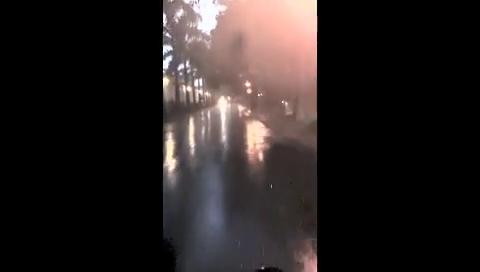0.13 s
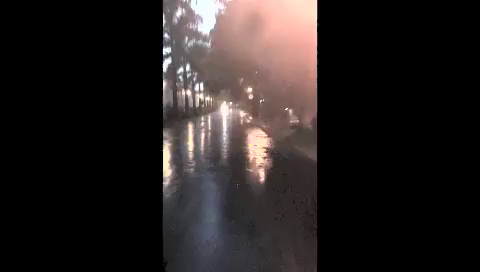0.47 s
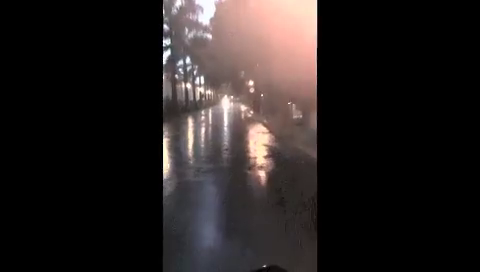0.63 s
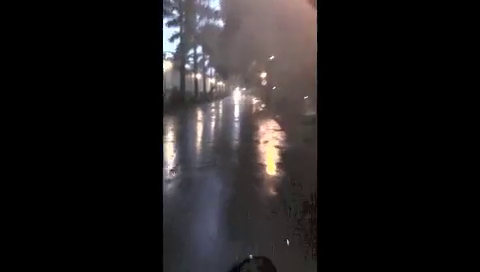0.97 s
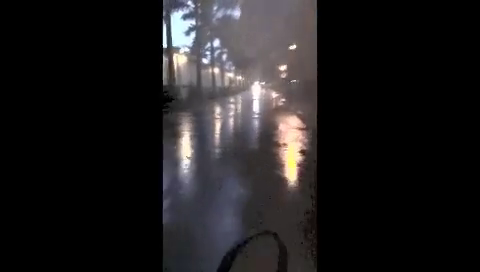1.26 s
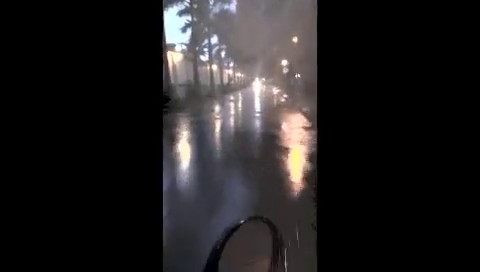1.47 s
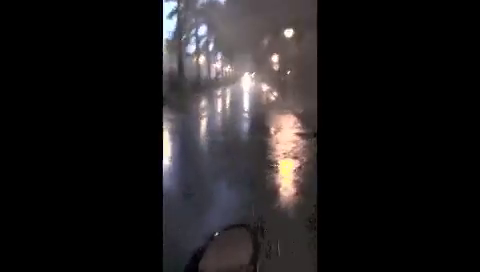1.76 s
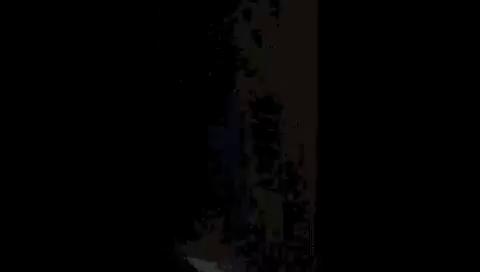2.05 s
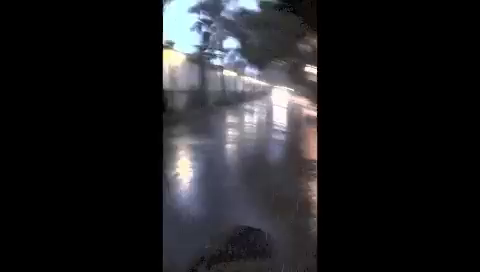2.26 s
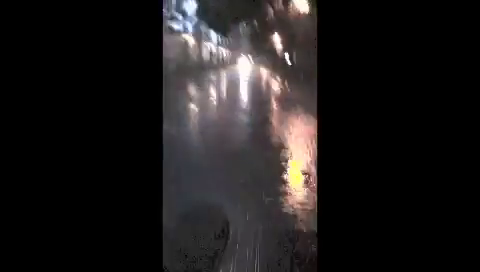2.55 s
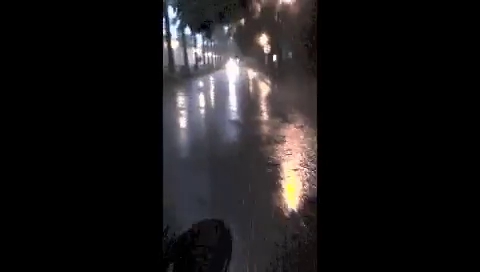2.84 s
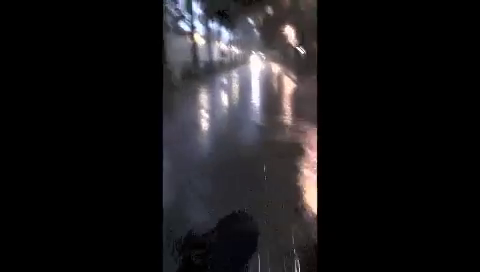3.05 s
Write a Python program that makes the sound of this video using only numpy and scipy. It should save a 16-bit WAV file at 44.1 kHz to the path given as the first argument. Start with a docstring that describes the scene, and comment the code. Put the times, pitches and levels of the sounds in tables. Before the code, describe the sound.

Small motorbike ride on a wet road: steady dull roar with faint uneven engine putter, raindrops knocking the microphone housing more often after one second, then heavy wind thumps late, heard through a muffled onboard microphone.

```python
"""A wet road in rain, ridden by a small motorbike, heard through a muffled microphone on board.
Exhaust thumps ring a pipe inside the road roar, which is drifting, flickering noise.
Wind gusts buffet the microphone with dense pushes and single slaps; the drops are short damped rings.
A gain control pulls everything down on the strongest sounds and recovers slowly."""
import sys
import numpy as np
from scipy import signal
from scipy.io import wavfile
from scipy.ndimage import uniform_filter1d, minimum_filter1d

SR = 44100
rng = np.random.default_rng(int(sys.argv[2]) if len(sys.argv) > 2 else 0)


def int16_out(signal):
    """Quantize to a 16-bit WAV file."""
    q = np.round(np.clip(np.atleast_2d(signal).T, -1, 1) * 32767)
    wavfile.write(sys.argv[1], SR, q.astype(np.int16))


def magnitude_from_level(level_db):
    """Linear magnitude for a level in decibels (20 dB per decade)."""
    exponent = np.asarray(level_db, float) / 20
    return 10 ** exponent


N = 141120

# road roar and spray, spectrum: (frequency [Hz], relative density [dB per Hz])
ROAR_COLOUR = [(24, -74), (40, -39.5), (75, -27.5), (101, -9.5), (120, 0.5), (281, -2.5), (326, -5.5),
               (361, -2.5), (463, -7.5), (691, -5.5), (1200, -19), (1580, -31.5), (4390, -53.5),
               (15700, -71.5)]
# roar level: (time [s], rms [dB])
ROAR_LEVEL = [(0, -30), (.3, -30.5), (.7, -28.5), (1.101, -28.5), (1.6, -27.5), (2.099, -29), (2.452, -26),
              (2.8, -27), (3.2, -29)]
PATCH_RMS_DB, FLICKER_RMS_DB = 0.5, 1.5

# heavy drops knocking on the housing: (time [s], peak [dB], pitch [Hz], second mode re first [dB])
KNOCKS = [(0.1224, -36.5, 1000, -0.5), (.405, -21, 993, -18), (1.2002, -13, 838, -14),
          (1.435, -32.5, 1000, -4), (1.499, -25, 880, -12), (1.61, -37, 1100, -2.5),
          (1.542, -13.5, 852, -18.5), (1.678, -18, 957, -17.5), (1.754, -16, 760, -19),
          (1.786, -15, 958, -12), (1.985, -18.5, 900, -22), (2.081, -23.5, 720, -19),
          (2.169, -18.5, 800, -14), (2.191, -16.5, 738, -14.5), (2.247, -19, 832, -17.5),
          (2.357, -8.5, 873, -25.5), (2.43, -36, 1300, -4), (2.778, -17.5, 850, -21),
          (2.71, -4.5, 850, -25), (2.854, -10, 772, -16.5), (2.981, -22, 683, -19)]
KNOCK_WIDTH_HZ, OVERTONE_RATIO = 246, 1.74
# fine drops ticking: (time [s], low mode [dB], middle mode [dB], high mode [dB])
TICKS = [(0.074, -46, -63, -56), (0.114, -46, -46, -49), (0.279, -47, -49, -57), (0.343, -60, -52, -53),
         (0.672, -46, -61, -85), (0.778, -43, -45.5, -48), (0.7923, -45, -59, -71),
         (0.8646, -46, -63.5, -71), (1.201, -25.5, -38.5, -52), (1.217, -57, -71, -50.5),
         (1.2813, -69, -53, -50.5), (1.421, -50, -49, -51), (1.468, -37, -52, -88), (1.4996, -48, -65, -73),
         (1.574, -36, -38.5, -46), (1.718, -65, -47, -49.5), (1.7864, -40, -47, -89),
         (1.8406, -48, -59, -52), (1.908, -49, -46, -47), (1.9445, -45, -47, -48.5),
         (2.1628, -47, -46, -75), (2.2458, -36, -38, -38.5), (2.496, -59, -50, -50),
         (2.5816, -61, -72.5, -66), (2.654, -42, -60, -46.5), (2.8194, -59, -38, -47),
         (2.8315, -58, -46, -66), (2.8536, -70, -42.5, -76), (2.9088, -78, -42.5, -46),
         (2.957, -59, -44.5, -48)]
# modes that a tick rings: (frequency [Hz], width [Hz])
TICK_MODES = [(2600, 560), (4200, 1200), (6800, 1700)]
REBOUND_MEAN_S, REBOUND_GAIN = .0012, 0.31  # a tick splashes back a moment later
# drops bursting close by: (time [s], peak [dB])
SNAPS = [(0.1126, -53), (1.28, -58), (2.2458, -42)]
SNAP_HZ, SNAP_WIDTH_HZ = 12000, 3800
# countless small drops; the least level holds for a 3 kHz drop
SPRAY_PER_S, SPRAY_LEAST_DB_AT_3KHZ, SPRAY_SPREAD_DB = 320, -57, 3.5
SPRAY_LOW_HZ, SPRAY_HIGH_HZ = 1205, 9050

# one list per gust: (time [s], low buffeting [dB], upper buffeting [dB])
GUSTS = [
    [(.788, -26.5, -29.5), (.81, -27, -26.5), (.832, -28.5, -27.5), (.85, -36, -29)],
    [(1.165, -27, -51), (1.185, -21, -35.5), (1.2, -24.5, -49), (1.21, -32, -43.5)],
    [(2.225, -27.5, -29), (2.245, -27.5, -39), (2.305, -21, -30), (2.318, -13, -16), (2.34, -19, -24),
     (2.365, -16.5, -34.5), (2.375, -55.5, -38.5)],
    [(2.512, -24, -38.5), (2.534, -16.5, -9), (2.58, -12.5, -10), (2.625, -18, -17.5), (2.648, -8, -6),
     (2.667, -14.5, -23.5), (2.695, -6.5, -7), (2.706, -23, -25), (2.727, -12, -20), (2.74, -38.5, -45.5)],
    [(2.85, -32, -32.5), (2.868, -16.5, -27.5), (2.9, -19, -22), (2.925, -25, -21.5), (2.945, -27, -37.5)],
]
# buffeting spectra: (frequency [Hz], relative density [dB per Hz])
LOW_WIND_COLOUR = [(25, -24.5), (80, -27), (150, 1), (250, -2), (400, -4), (600, -22.5), (1500, -64.5),
                   (5000, -93)]
UPPER_WIND_COLOUR = [(200, -56), (350, -5.5), (550, 8), (800, 7), (1100, -13), (1800, -38.5), (3000, -52),
                     (9000, -79)]
EDDIES_PER_S, EDDY_SPREAD_DB = 2400, 2
# single hard slaps of air on the microphone: (time [s], peak [dB], pitch [Hz])
SLAPS = [(.157, -16.5, 277), (.8275, -17, 666), (2.3176, 1, 254.6), (2.576, -8.5, 765), (.7975, -11, 560),
         (.8095, -9, 620), (.826, -11.5, 300), (.8385, -13, 600), (1.557, -17.5, 240), (2.5365, -0.5, 700),
         (2.544, -4, 650), (2.554, -0.5, 720), (2.597, -1, 620), (2.619, -5, 720), (2.651, 6.5, 700)]
SLAP_WIDTH_RATIO = 0.43  # width / pitch
CRACK_RATIO, CRACK_DB = 2.3, -27  # crack on top of a slap: pitch and level re slap
# crackle of the strongest gust: (time [s], rms [dB])
CRACKLE_LEVEL = [(2.528, -63.5), (2.55, -31), (2.59, -22.5), (2.61, -45.5), (2.65, -34), (2.67, -69.5)]
# crackle spectrum: (frequency [Hz], relative density [dB per Hz])
CRACKLE_COLOUR = [(700, -18.5), (1200, 11), (2000, -6.5), (3000, -26), (5000, -48.5), (12000, -79)]

# engine speed: (time [s], firing rate [1/s])
ENGINE_SPEED = [(0, 23.9), (.8, 23.8), (1.0, 25.2), (1.3, 24.85), (1.67, 25.7), (2.15, 26.2), (2.42, 24.7),
                (2.68, 26.4), (3.2, 27.7)]
FIRING_S, UNEVEN_RMS_DB, JITTER_RMS_S = 1.903, 3, .001  # FIRING_S: time of one firing before jitter
# exhaust pipe modes: (frequency [Hz], width [Hz], relative level [dB])
PIPE_MODES = [(152, 68, 2.5), (228.3, 95, 4), (320, 360, -13.5), (720, 93, -4.5)]
# exhaust level: (time [s], rms [dB])
EXHAUST_LEVEL = [(0, -38), (.8, -36), (1.2, -35), (1.9, -32.5), (2.6, -32), (3.2, -34)]

HISS_DB, HISS_LOW_HZ, LOW_CUT_HZ = -75.5, 12200, 130.6  # HISS_DB: gain on high-passed unit noise
KNEE_DB, SQUEEZE_DB_PER_DB = -14.5, 0.69
RECOVER_DB_PER_S, ATTACK_S = 7, 0.011
BEND, CEILING = .12, .69  # square-law share, limiter peak


def evened(x):
    """Scales to rms 1."""
    return x / np.sqrt(np.mean(x ** 2) + 1e-20)


def read(points, hz):
    """Reads a spectrum on a log-frequency axis."""
    f, value = np.transpose(points)
    return np.interp(np.log(hz + 1), np.log(f + 1), value)


def level(points):
    """Gain of every sample from a (time, dB) table."""
    return magnitude_from_level(np.interp(np.arange(N) / SR, *np.transpose(points)))


def add(mix, s, sound):
    """Mixes a sound in at a time."""
    part = mix[round(s * SR):][:len(sound)]
    part += sound[:len(part)]


def coloured(x, points):
    """Filters by a spectrum with minimum phase, then scales to rms 1."""
    hz = np.abs(np.fft.fftfreq(8192, 1 / SR))
    log_gain = np.log(magnitude_from_level(read(points, hz)))
    taps = np.fft.ifft(np.exp(np.conj(signal.hilbert(log_gain)))).real
    starts_early = np.abs(taps[:64]).sum() > np.abs(taps[-64:]).sum()
    if not starts_early:
        taps = np.roll(taps[::-1], 1)
    return evened(signal.oaconvolve(x, taps[:4096])[:N])


def ring(hz, width_hz):
    """One damped ring of peak about 1 that swells smoothly, then dies."""
    t = np.arange(2048) / SR
    shape = t ** 2 * np.exp(-2 * np.pi * width_hz * t)
    return shape / shape.max() * np.sin(2 * np.pi * min(hz, SR / 2.5) * t)


def roar():
    """Tyres on water, air flow and far rain: noise with drifting patches and a fast shared flicker."""
    frames, hz = N // 128 + 5, np.fft.rfftfreq(512, 1 / SR)
    real, imag, patches = rng.standard_normal((frames, 257, 3)).T
    patches = uniform_filter1d(patches, size=5, axis=0)  # across frequency
    patches = evened(uniform_filter1d(patches, size=10, axis=1))  # across time
    flicker = evened(uniform_filter1d(rng.standard_normal(frames), size=3))
    below_5khz = (hz < 5000)[:, None]
    gain = magnitude_from_level(PATCH_RMS_DB * patches + FLICKER_RMS_DB * flicker * below_5khz)
    noise = signal.istft((real + 1j * imag) * gain, nperseg=512, noverlap=384)[1][:N]
    return coloured(noise, ROAR_COLOUR) * level(ROAR_LEVEL)


def spray():
    """Small drops at random times, each ringing one of eight pitches; higher ones are weaker."""
    out = np.zeros(N)
    size_db = SPRAY_LEAST_DB_AT_3KHZ + SPRAY_SPREAD_DB * np.minimum(rng.exponential(1, N), 2)
    size = magnitude_from_level(size_db) * (rng.random(N) < SPRAY_PER_S / SR)
    kind = rng.integers(0, 8, N)
    for k, hz in enumerate(np.geomspace(SPRAY_LOW_HZ, SPRAY_HIGH_HZ, num=8)):
        drop = ring(hz, 0.36 * hz) * (3000 / hz) ** 1.98
        out += signal.oaconvolve(size * (kind == k), drop)[:N]
    return out


def drops():
    """Knocks ring two modes, ticks three modes with a rebound, snaps one; spray lies beneath."""
    out = spray()
    for s, db, hz, second_db in KNOCKS:
        first = ring(hz, KNOCK_WIDTH_HZ)
        second = magnitude_from_level(second_db) * ring(OVERTONE_RATIO * hz, KNOCK_WIDTH_HZ)
        add(out, s, magnitude_from_level(db) * (first + second))
    for s, *levels_db in TICKS:
        tick = sum(magnitude_from_level(db) * ring(*mode) for db, mode in zip(levels_db, TICK_MODES))
        add(out, s, tick)
        add(out, s + REBOUND_MEAN_S * (.5 + rng.random()), REBOUND_GAIN * tick)
    for s, db in SNAPS:
        add(out, s, magnitude_from_level(db) * ring(SNAP_HZ, SNAP_WIDTH_HZ))
    return out


def eddies():
    """Random pushes of either sign and uneven size."""
    size = magnitude_from_level(EDDY_SPREAD_DB * np.minimum(rng.exponential(1, N), 4))
    return size * rng.choice([-1, 1], N) * (rng.random(N) < EDDIES_PER_S / SR)


def slap(hz):
    """One push of air: a negative broad ring with a faint higher crack."""
    crack_hz = CRACK_RATIO * hz
    crack = magnitude_from_level(CRACK_DB) * ring(crack_hz, SLAP_WIDTH_RATIO * crack_hz)
    return -(ring(hz, SLAP_WIDTH_RATIO * hz) + crack)


def wind():
    """Eddies push the microphone, low and upper, during each gust; a few land as single slaps."""
    t, out = np.arange(N) / SR, np.zeros(N)
    for column, colour in enumerate((LOW_WIND_COLOUR, UPPER_WIND_COLOUR), start=1):
        buffeting = coloured(eddies(), colour)
        for gust in map(np.array, GUSTS):
            fade = np.clip(np.minimum(t - gust[0, 0], gust[-1, 0] - t) / 0.011, 0, 1)
            out += buffeting * fade * magnitude_from_level(np.interp(t, gust[:, 0], gust[:, column]))
    for s, db, hz in SLAPS:
        add(out, s, magnitude_from_level(db) * slap(hz))
    s, db = np.transpose(CRACKLE_LEVEL)
    return out + coloured(eddies(), CRACKLE_COLOUR) * magnitude_from_level(np.interp(t, s, db, -99, -99))


def engine():
    """One uneven thump per firing rings in the exhaust pipe."""
    s, rate = np.transpose(ENGINE_SPEED)
    t = np.arange(N) / SR
    firings = np.cumsum(np.interp(t, s, rate)) / SR
    at = np.flatnonzero(np.diff(np.floor(firings - np.interp(FIRING_S, t, firings))))
    late, strength = rng.standard_normal((120, 2))[:len(at)].T
    at = np.clip(at + JITTER_RMS_S * SR * late, 0, N - 1).astype(int)
    thumps = np.zeros(N)
    thumps[at] = magnitude_from_level(UNEVEN_RMS_DB * strength)
    pipe = sum(magnitude_from_level(db) * ring(hz, width_hz) for hz, width_hz, db in PIPE_MODES)
    return evened(signal.oaconvolve(thumps, pipe)[:N]) * level(EXHAUST_LEVEL)


def scene():
    """All sources reach one microphone."""
    return (roar() + drops() + wind() + engine())[None]


def top_cut(x):
    """Nothing passes above the cut-off."""
    return signal.sosfilt(signal.butter(12, 15850, fs=SR, output="sos"), x)


def record(dry):
    """Bass cut, faint hiss, gain control with fast drop and slow recovery, square-law bend, peak limiter."""
    hiss_cut = signal.butter(2, HISS_LOW_HZ, "high", fs=SR, output="sos")
    hiss = magnitude_from_level(HISS_DB) * signal.sosfilt(hiss_cut, rng.standard_normal(N))
    bass_cut = signal.butter(3, LOW_CUT_HZ, "high", fs=SR, output="sos")
    mic = signal.sosfilt(bass_cut, dry) + hiss

    power_db = 10 * np.log10(abs(uniform_filter1d(mic[0] ** 2, size=440)) + 1e-12)
    fall_db = np.arange(N) * RECOVER_DB_PER_S / SR
    wanted_db = SQUEEZE_DB_PER_DB * np.maximum(power_db - KNEE_DB, 0)
    held_db = np.maximum.accumulate(wanted_db + fall_db) - fall_db  # peak hold, linear recovery in dB
    pace = 1 / (ATTACK_S * SR)
    cut_db = signal.lfilter([pace], [1, pace - 1], np.maximum(held_db, 0))
    ducked = mic / magnitude_from_level(cut_db)

    bent = ducked + BEND * (ducked ** 2 - np.mean(ducked ** 2))
    peak_gain = np.minimum(CEILING / (np.abs(bent) + 1e-9), 1)
    limiter_gain = uniform_filter1d(minimum_filter1d(peak_gain, size=201), size=201)
    return top_cut(bent * limiter_gain)


dry = scene()
out = record(dry)
int16_out(out)
```